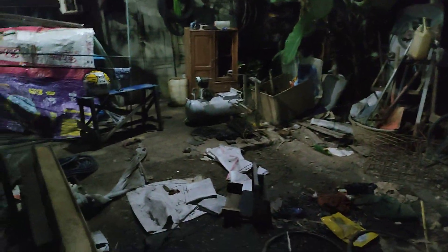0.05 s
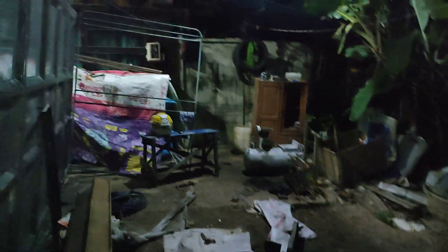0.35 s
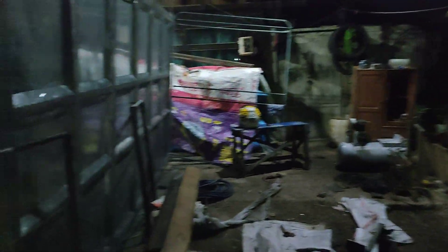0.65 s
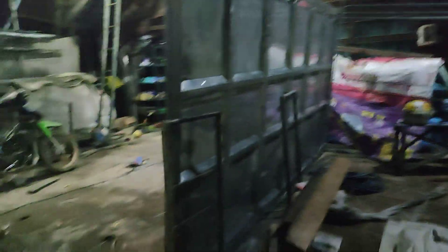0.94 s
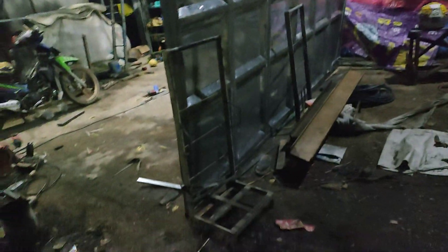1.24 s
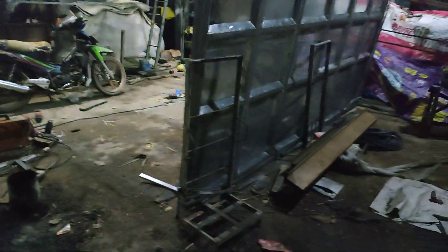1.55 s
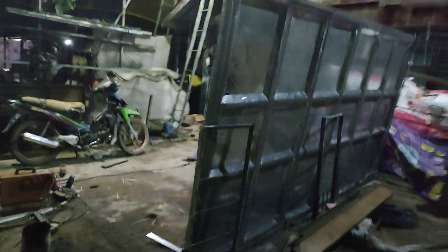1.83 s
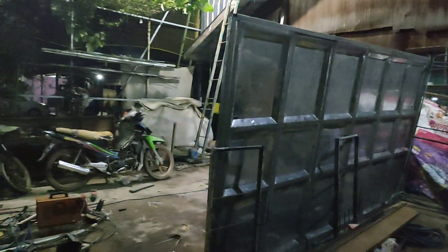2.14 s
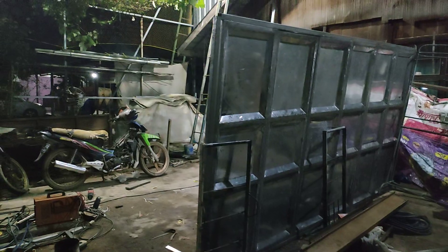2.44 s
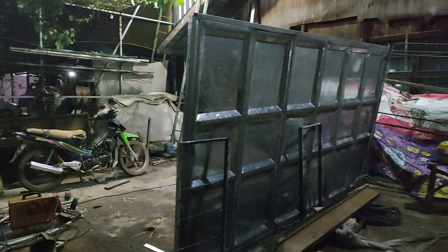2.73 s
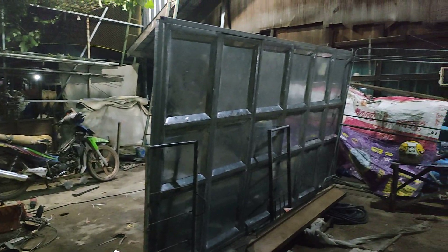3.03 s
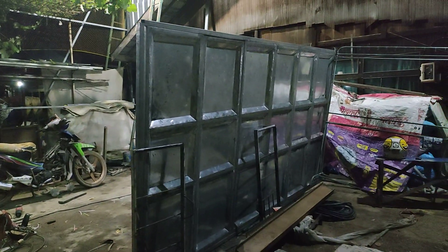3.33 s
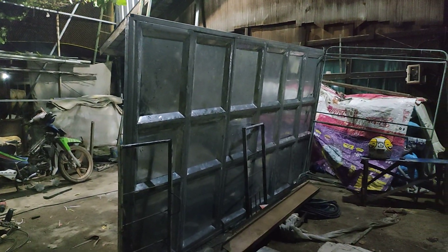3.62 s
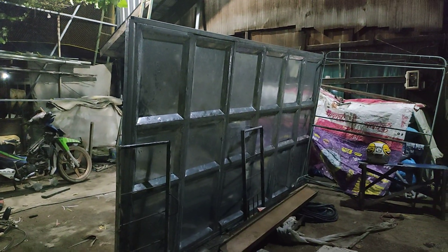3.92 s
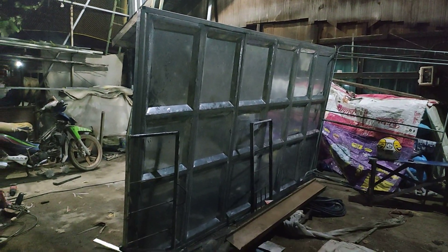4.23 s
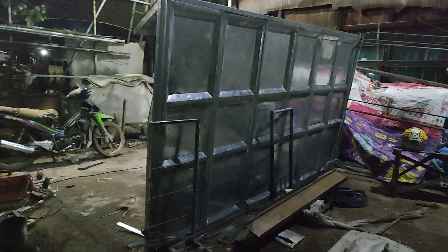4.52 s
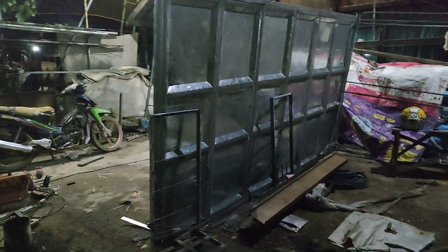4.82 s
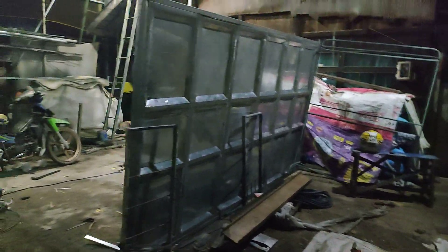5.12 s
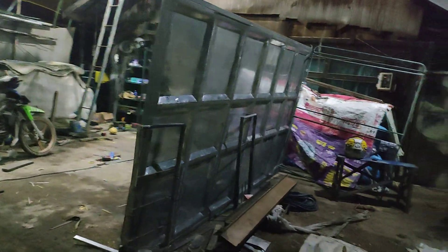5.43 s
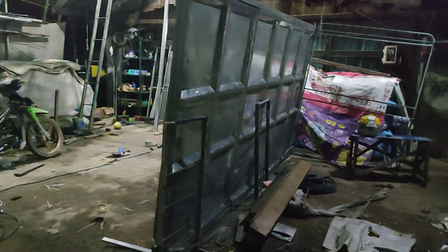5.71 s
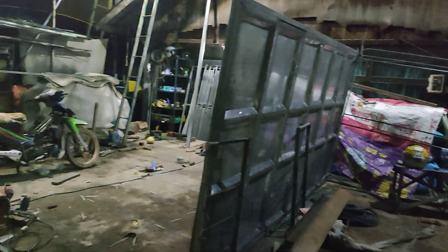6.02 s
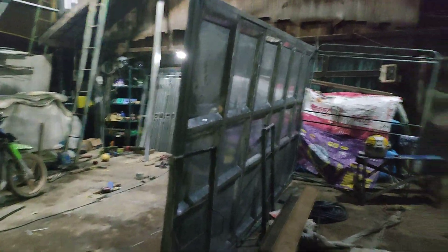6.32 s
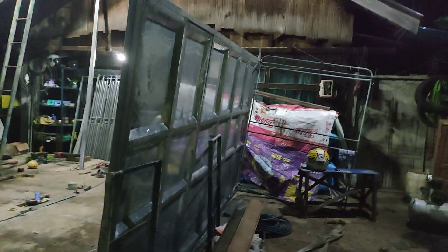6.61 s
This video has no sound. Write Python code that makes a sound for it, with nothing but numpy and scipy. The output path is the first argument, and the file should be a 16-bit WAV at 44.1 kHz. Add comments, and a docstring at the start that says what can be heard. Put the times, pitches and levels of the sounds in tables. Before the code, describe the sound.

Crickets shrill steadily at night while gritty footsteps and handling knocks sound close by, and a gecko chucks four times.

```python
"""Crickets shrill all around a cluttered yard at night, and two geckos chuck, one far off, one near.
The crickets rub their wings; the geckos send quick pulses through a ringing throat.
Someone takes a few steps, stands still, then walks on: grit scuffs and cracks, heels thud, clothes
rustle, and fingers knock and click on a hand-held camera. Walls and a steel gate answer faintly."""
import sys
import numpy as np
from scipy import signal
from scipy.fft import rfft, irfft, next_fast_len
from scipy.io import wavfile
from scipy.ndimage import uniform_filter1d, map_coordinates

SR = 44100
rng = np.random.default_rng(int(sys.argv[2]) if len(sys.argv) > 2 else 0)


def generate_wav(signal):
    """Clip the signal to [-1, 1] and save it as 16-bit WAV at the path in sys.argv[1]."""
    frames = np.transpose(np.atleast_2d(signal))
    scaled = np.clip(frames, -1, 1) * 32767
    pcm = np.round(scaled).astype(np.int16)
    wavfile.write(sys.argv[1], SR, pcm)


N = 293706
TIME = np.arange(N) / SR

# how alike the two ears hear the surroundings: (frequency [Hz], likeness [0 to 1])
AROUND_LIKENESS = [(40, 0.38), (250, 0.55), (650, 0.31), (1400, 0), (7000, 0.0025)]
# the same for sounds from the ground: (frequency [Hz], likeness [0 to 1])
GROUND_LIKENESS = [(100, 1), (640, 0.57), (1400, 0.23), (3100, 0.34), (7000, 0.08)]


def shrill_crickets(period_s=.1246, chirp_share=0.4, depth_db=5.5, rasp_db=2.5):
    """One cricket chirps eight times a second over a steady chorus; the walls smear its wing strokes."""
    # loudness of the chorus: (time [s], level [dB])
    loudness = [(0, -55), (2.4, -53.2), (3.4, -54.4), (6.66, -54)]
    # tone colour of the wings: (frequency [Hz], level [dB])
    wing_tone = [(4500, -41), (6000, -20.5), (6500, -3.5), (6880, 2), (7250, -4), (7600, -14.5),
                 (7950, -26.5), (8600, -48), (12500, -53), (13800, -31), (15000, -70)]
    beat = np.cos(2 * np.pi * (TIME - .025 + 0.0025 * wobble(5.7)) / period_s)
    chirp = unit(amp(depth_db * beat + wobble(6.8) + rasp_db * wobble(300)))
    soloist = np.sqrt(chirp_share) * noise(wing_tone, AROUND_LIKENESS, chirp)
    chorus = np.sqrt(1 - chirp_share) * noise(wing_tone, AROUND_LIKENESS)
    return amp(over_time(loudness)) * (soloist + chorus)


def geckos(pulse_hz=275, jitter=.07, pulse_t60=.013, sag=.025, echo_delay_s=.012):
    """Each chuck is a swell of quick pulses ringing a throat whose pitch sags a little."""
    # six far chucks, then four near:
    # (time [s], level [dB], pitch [Hz], breadth of the resonance [factor], half length [s], echo [dB])
    chucks = [(3.195, -54.5, 3960, 1.7, .016, -6.5), (3.375, -57, 3910, 1.9, .02, -3.5),
              (3.564, -54.5, 3880, 1.6, .016, -6), (3.765, -55.5, 3760, 2, .022, -5.5),
              (4, -58.5, 3810, 1.6, .021, -6), (4.162, -57.5, 4170, 1.6, .018, -8),
              (5.157, -36, 4110, 1.03, .013, -8.5), (5.324, -36, 4110, 1.07, .013, -8.5),
              (5.523, -33.5, 4120, 1.02, .012, -9.5), (5.735, -35.5, 4110, 1.04, .012, -8)]
    # the throat's resonance: (frequency [multiple of the pitch], level [dB])
    throat_tone = [(.2, -60), (.33, -37), (.41, -16), (.5, -20.5), (.69, -14.5), (.735, -18.5),
                   (.775, -8.5), (.83, -14), (.9, -3.5), (.96, 0), (1.035, 4), (1.08, -2.5), (1.115, -15),
                   (1.16, -7), (1.21, -19), (1.4, -19.5), (2, -66)]
    out, t = np.zeros((2, N)), np.arange(SR // 5) / SR
    middle = t.mean()
    for s, db, hz, breadth, width, echo_db in chucks:
        age = (t - middle) / width
        swell = np.clip(age + 2.45, 0, 1) / np.cosh(age)
        cycles = np.cumsum(pulse_hz * np.exp(jitter * wobble(150, size=len(t)))) / SR
        # every pulse is a sharp tick followed by a fading hiss
        ticks = unit(np.diff(np.floor(cycles), prepend=0))
        hiss = unit(fade(cycles % 1 / pulse_hz, pulse_t60) * rng.standard_normal((2, len(t))))
        voice = resonate(.8 * ticks + hiss, lambda f: along(throat_tone, (f / hz) ** (1 / breadth)))
        glide = np.cumsum(1 - sag * np.tanh(age))
        voice = np.array([map_coordinates(side, [glide]) for side in voice])
        call = amp(db) * swell * panned(unit(voice), pan_db=-2.0)
        add(out, s - middle, call)
        add(out, s - middle + echo_delay_s, amp(echo_db) * yard_echo(call))
    return out


def snaps_and_clicks(hump_db=6, hump_octaves=0.4, bright_hz=2840, echo_db=-13):
    """Grit cracks underfoot and the handled camera clicks: a sharp burst, a short ring, a low push."""
    # (time [s], level [dB], pitch [Hz], left over right [dB], low push [dB], ring [dB])
    snaps = [(.233, -26.5, 1090, 2, 5.5, -8), (.277, -38, 1500, 0, -10, -8),
             (.378, -36.5, 1920, -17, -16, -1), (.769, -38, 1490, -9, -13, -15.5),
             (0.9064, -18, 1980, 2, -0.5, -2), (.913, -22, 2070, 3, -12, -8),
             (0.9367, -22.5, 1600, -12, -14, 0), (.946, -22, 1080, 2, 1, -5),
             (.947, -16.5, 2835, -2, -3, 2), (.9482, -15.5, 2850, 0, -3, 2),
             (1.0628, -19.5, 3980, -4, -6, -3), (1.0716, -32, 1490, 8, -1, -6),
             (1.078, -22.5, 2820, 14, -20, -4.5), (1.089, -35, 1300, 5, -5, -6),
             (1.166, -30.5, 4570, -2, -.5, -5), (1.4226, -16.5, 1116, 1, 3.5, -7),
             (1.4275, -27, 1710, -2, -8, -8), (1.447, -33.5, 3350, 0, -15, 0),
             (1.452, -33, 1100, 0, -8, -2), (1.544, -24, 4180, -10, -25, 0.5),
             (2.0195, -28, 3200, 0, -25, -5), (2.0252, -22.5, 2940, -5, -26, 0),
             (2.0283, -21.5, 2940, 7, -30, -4.5), (2.0305, -28, 1290, 0, -20, 0),
             (2.171, -24.5, 3640, 15, -6, -18), (2.3486, -31, 2520, 14, -10, -8),
             (3.236, -42, 2900, 0, -15, -10), (5.412, -37, 1900, -2, -15, -6),
             (5.433, -29, 3800, -3, -13, -11), (5.4413, -26, 4730, -5, -32, -8),
             (6.029, -42, 6500, 2, -18, -10), (6.2112, -28.5, 2050, -3, -19, -0.5),
             (6.236, -22, 1740, -1, -9, -15), (6.255, -36, 3700, 0, -10, -3),
             (6.408, -41, 2370, 0, -15, -9), (6.418, -40, 2200, 1, -13, -9),
             (6.4575, -27, 1740, -7, -30, -3), (6.468, -26, 1650, -3, -17, -8),
             (6.4965, -31.5, 1520, 0, -22, -2), (6.524, -22.5, 3620, -1, -12, -3),
             (6.529, -28, 2250, -2, -16, -1.5), (6.552, -32.5, 3200, -9, 5, -7)]
    # tone colour of a snap: (frequency [Hz], level [dB])
    snap_tone = [(60, -55), (200, 2.5), (500, -6.5), (1200, 8), (3000, -0.5), (4500, -3.5), (7000, -20),
                 (10000, -35), (15000, -46)]
    out, t = np.zeros((2, N)), np.arange(SR // 20) / SR
    onset = 1 - np.exp(-t / .0004)
    for s, db, hz, pan_db, push_db, ring_db in snaps:
        burst = fade(t, t60=.006) * (0.76 * rng.standard_normal(len(t)) + rng.standard_normal((2, len(t))))
        burst[:, SR // 2000] -= 5  # the click
        # a snap is lifted around its own pitch, and high ones tick brighter
        hump = lambda f: hump_db * np.exp(-(np.log2((f + 1) / hz) / hump_octaves) ** 2)
        tilt = 11.5 * max(np.log2(hz / bright_hz), 0)  # dB per octave
        snap = resonate(burst, lambda f: along(snap_tone, f) + tilt * np.log2(f / hz + 0.041) + hump(f))
        snap *= 3 / np.linalg.norm(snap, axis=1, keepdims=True)
        ring = amp(ring_db) * np.sin(2 * np.pi * hz * t + [[0], [1.2]]) * fade(t, t60=0.014)
        push = amp(push_db - 3) * np.cos(2 * np.pi * 600 * t) * fade(t, t60=0.0059)
        add(out, s + 0.001735, amp(db) * panned(snap + (ring + push) * onset, pan_db))
        add(out, s + .006, amp(db + echo_db) * yard_echo(snap))
    return out


def dull_knocks(firm_hz=593, firm_t60=0.0088, lag_s=0.0004, attack_s=0.0009, echo_db=-27):
    """Fingers knock on the camera's case and a few heels thud on the ground: a thump and a brief ring."""
    # (time [s], level [dB], pitch [Hz], left over right [dB], ring [dB])
    knocks = [(.101, -45, 337, 10, 0), (0.3431, -23, 420, -11, 3.5), (.405, -35.5, 460, 28, 0),
              (.45, -41, 455, 5, 9), (1.078, -22, 638, 16, -4), (1.097, -30.5, 624, 6, -7),
              (1.1261, -21, 630, 18, -9), (1.141, -29.5, 590, 16, -6), (1.5875, -33, 800, 18, -5),
              (1.6133, -19, 610, 17, -8), (1.623, -27, 614, 13, -9.5), (1.63, -30, 720, 6, -2),
              (2.1689, -28.5, 620, 11.5, -7), (2.205, -29.5, 626, 14, -12), (2.2695, -36, 520, 17, 1),
              (2.319, -43, 600, 11, 0), (2.329, -39, 480, 11, 11), (2.3476, -22, 625, 15, -10),
              (2.365, -30, 546, 7, -6), (2.376, -38, 557, 11.5, -13), (5.025, -42.5, 425, 16, -2),
              (5.866, -47, 326, 0.5, 6), (6.236, -38.5, 510, 0.5, -3), (6.281, -43, 620, 11, -9),
              (6.298, -39.5, 620, 17, -12), (6.334, -44, 340, 0.5, 3), (6.523, -25, 644, 0.5, -11)]
    # the notes the case rings at: (frequency [Hz], level [dB], time to fade by 60 dB [s])
    case_notes = [(415, -14.5, 0.032), (1075, -4, 0.012), (1430, -1, 0.0065), (2440, -8, 0.013),
                  (3770, -6, 0.0057)]
    out, t = np.zeros((2, N)), np.arange(SR // 12) / SR
    for s, db, hz, pan_db, ring_db in knocks:
        t60 = firm_t60 * (firm_hz / hz) ** 2.6  # a softer, lower thump rings longer
        age = np.maximum(t - lag_s * np.array([[pan_db < 0], [pan_db > 0]]), 0)  # nearer side first
        thump = -np.sin(2 * np.pi * hz * age) * fade(age, t60)
        ring = 0
        for note_hz, note_db, note_t60 in case_notes:
            strength = amp(note_db + rng.normal(0, 4.2))
            detuned_hz = note_hz * (1 + rng.normal() * 0.035)
            ring += strength * np.sin(2 * np.pi * detuned_hz * age) * fade(age, note_t60)
        knock = (thump - amp(ring_db) * ring) * (1 - np.exp(-age / attack_s))
        # a knock has little bass, and a soft, low one leaves the treble out
        top_hz = np.clip(6 * hz * (hz / 600) ** 2, 1400, 5000)
        knock = signal.sosfilt(signal.butter(2, [240, top_hz], "bandpass", fs=SR, output="sos"), knock)
        knock = amp(db + 1.5) * panned(knock / np.abs(knock).max(), pan_db)
        add(out, s + 0.001763, knock)
        add(out, s + 0.005, amp(echo_db) * yard_echo(knock))
    return out


def sole_strokes(drag_delay_s=.115, drag_rise_s=0.09, drag_fall_s=0.11, drag_heel_db=-14):
    """In every step the sole presses down, then rolls off and drags."""
    # (time [s], level [dB], rise by 20 dB [s], fall by 20 dB [s], heel [dB], drag [dB])
    steps = [(.222, -42, 0.02, .099, -14, -16.5), (.957, -38, .06, 0.08, -9.5, -13),
             (1.418, -38, .036, .115, -13, -9.5), (2.028, -36.5, 0.04, .03, -37, -20.5),
             (2.219, -56, .05, 0.39, -16, -3), (2.519, -54.5, 0.14, 0.16, -29, -27),
             (3.255, -57.5, 0.04, 0.12, 1, -9), (4.135, -62, 0.05, 0.13, 2.5, -18),
             (5.437, -40, .048, .03, -10.5, -16), (5.869, -53.5, 0.01, .076, 4.5, -4.5),
             (6.212, -46, 0.02, .06, -29, -19), (6.262, -44, 0.03, 0.085, -10, -17),
             (6.467, -45.5, 0.04, .14, -36, -14), (6.536, -48, 0.01, .1, -4.5, -29)]
    presses = [step[:5] for step in steps]
    drags = [(s + drag_delay_s, db + drag_db, drag_rise_s, drag_fall_s, drag_heel_db)
             for s, db, *_, drag_db in steps]
    return presses + drags


def scuffs(grain_db=4, clump_db=1.1):
    """Grit gives way under a sole in uneven clumps, over the heel's dull tread."""
    # tone colours of the grit and of the heel: (frequency [Hz], level [dB])
    grit_tone = [(88, -38), (150, -12), (787, -16), (1320, -5), (2360, -5.5), (2860, -4.5), (4000, -4.5),
                 (4700, -7), (6300, -10.5), (6940, -11), (8100, -37), (9090, -29), (10000, -25),
                 (15000, -29.5)]
    heel_tone = [(70, -34), (150, -6.5), (260, 4.5), (400, 2), (600, 3), (1000, -0.5), (2000, -13.5),
                 (4000, -52)]
    grit, heel = np.zeros(N), np.zeros(N)
    for s, db, rise, fall, heel_db in sole_strokes():
        span = slice(*np.searchsorted(TIME, [s - 2 * rise, s + 2 * fall + .2]))
        age = TIME[span] - s
        power = amp(db - 20 * np.maximum(-age / rise, age / fall)) ** 2
        grit[span] += power
        heel[span] += power * amp(heel_db) ** 2
    crunch = noise(grit_tone, GROUND_LIKENESS, amp(grain_db * wobble(1500) + clump_db * wobble(140)))
    return np.sqrt(grit) * crunch + np.sqrt(heel) * noise(heel_tone, GROUND_LIKENESS)


def grain_ticks(count, gain_db, spread_db, hz, t60):
    """Under each sole single grains tick, each at its own pitch."""
    out, t = np.zeros((2, N)), np.arange(SR // 50) / SR
    shape = fade(t, t60) * (1 - np.exp(-t / 0.00012))
    for s, db, rise, fall, _ in sole_strokes():
        for when, size, pitch, left, right in np.clip(rng.standard_normal((count, 5)), -2, 2):
            tick = np.sin(2 * np.pi * hz * np.exp(.4 * pitch) * t + [[left], [right]]) * shape
            start = s + .5 * when * (fall if when > 0 else rise)
            add(out, start, amp(db + gain_db + spread_db * size - 7.3 * abs(when)) * tick)
    return out


def weight_thuds():
    """The walker's weight lands on the ground with a dull thud."""
    # (time [s], level [dB], pitch [Hz], half length [s])
    landings = [(5.882, -55.5, 265, 0.021), (6.342, -54, 230, 0.012)]
    return soft_tones(landings, waver=.15)


def sand_slides(grain_db=9.0, clump_db=2):
    """Sand under a sliding sole crunches in fine, bright clumps."""
    # (time [s], level [dB], half length [s])
    slides = [(.25, -66, .025), (.8, -74, .1), (.92, -64, .04), (1.43, -70, 0.03), (1.495, -64, 0.024),
              (2.2, -73, 0.17), (2.54, -74, 0.066), (3.41, -64.5, 0.006), (5.38, -70, 0.054),
              (5.55, -69, 0.05), (6.23, -67, 0.037), (6.53, -69.5, 0.093)]
    # tone colour of the sand: (frequency [Hz], level [dB])
    sand_tone = [(3500, -37), (6000, -1), (9000, -3), (12000, 6), (15000, -5)]
    clumps = amp(grain_db * wobble(1200) + clump_db * wobble(130))
    return np.sqrt(swells(slides)) * noise(sand_tone, GROUND_LIKENESS, clumps)


def slow_cricket(half_length_s=0.041, echo_delay_s=0.073, echo_db=-11.5, echo_stretch=3.2):
    """A slower, lower cricket's soft, raspy chirps linger between the walls."""
    # about three and a half chirps a second: (time [s], level [dB])
    chirps = [(.095, -60.5), (.42, -60), (.65, -64), (.94, -65), (1.2, -54), (1.48, -57.5), (1.75, -53),
              (2, -57), (2.26, -54.5), (2.55, -54), (2.84, -56), (3.12, -58), (3.42, -55.5), (3.74, -62),
              (4.22, -59.5), (4.49, -61), (4.79, -54.5), (5.05, -55), (5.32, -52.5), (5.6, -51.5),
              (5.88, -52.5), (6.19, -53), (6.5, -54.5)]
    # tone colour of a chirp: (frequency [Hz], level [dB])
    chirp_tone = [(4300, -36), (5000, -3.5), (5450, 2), (5850, -4.5), (6500, -5), (7500, -36.5)]
    direct = [(s, db, half_length_s) for s, db in chirps]
    late = [(s + echo_delay_s, db + echo_db, half_length_s * echo_stretch) for s, db in chirps]
    return np.sqrt(swells(direct + late)) * noise(chirp_tone, AROUND_LIKENESS, amp(1.3 * wobble(250)))


def bush_crickets():
    """Crickets in the bushes blend into an even, high sizzle."""
    # (frequency [Hz], level [dB])
    sizzle_tone = [(7800, -63), (8300, -4), (8650, 2.5), (9400, 0), (9850, -10), (10300, -65), (12000, -54)]
    return amp(-65.5 + 1.64 * wobble(7)) * noise(sizzle_tone, AROUND_LIKENESS, amp(1.16 * wobble(250)))


def far_peeps():
    """Three faint peeps sound far away."""
    # (time [s], level [dB], pitch [Hz], half length [s])
    peeps = [(.61, -60, 2770, .025), (3.45, -66, 2450, .025), (4.69, -71, 895, .028)]
    return soft_tones(peeps, waver=.05)


def air_and_clothes(air_db=-71.5, clothes_db=-67):
    """As the walker moves, air rumbles over the microphone and clothes rustle."""
    # how much the walker moves: (time [s], motion [dB])
    motion = [(0, 7), (2.3, -1.5), (3.1, -13.5), (4.8, -6), (5.4, 6), (6.66, -34)]
    # swings of the camera and swishes of cloth: (time [s], level [dB], half length [s])
    swings = [(.02, -45, 0.02), (1.03, -58, 0.07), (1.5, -62, 0.068), (2.96, -66.5, 0.11), (5.58, -55, 0.1),
              (6.15, -65, 0.09)]
    swishes = [(0, -51.5, 0.033), (.42, -55, 0.066), (1, -62, 0.14), (2.6, -66.5, 0.12),
               (3.9, -68.5, 0.078), (5.52, -56, 0.062), (5.91, -56, 0.047), (6.08, -59, 0.097),
               (6.25, -61, 0.55)]
    # tone colours of the air and of the cloth: (frequency [Hz], level [dB])
    air_tone = [(15, 9.5), (33, 13), (50, 9), (75, -14), (200, -75)]
    cloth_tone = [(100, -50), (200, -10), (380, 1), (600, -4), (900, -11), (3000, -10), (8000, -24),
                  (12000, -36.5)]
    motion_db = over_time(motion)
    flow = np.sqrt(amp(air_db + 0.39 * motion_db) ** 2 + swells(swings)) * amp(2.8 * wobble(7.2))
    air = np.sqrt(np.mean(flow ** 2)) * panned(noise(air_tone, AROUND_LIKENESS, flow), pan_db=1.0)
    rubbing = np.sqrt(amp(clothes_db + motion_db) ** 2 + swells(swishes)) * amp(2.74 * wobble(25))
    return air + rubbing * patchy(noise(cloth_tone, AROUND_LIKENESS))


def night_hush(level_db=-59.5):
    """The far hush of the night shimmers softly behind everything."""
    # (frequency [Hz], level [dB])
    hush_tone = [(25, 5), (110, -0.5), (195, 3.5), (300, -5), (600, -12.5), (1300, -15.5), (2100, -11),
                 (3000, -5), (3600, -4.5), (4150, -2), (4700, -10.5), (5500, 1.5), (6300, -6), (8000, -14),
                 (11000, -39), (15000, -42)]
    return amp(level_db) * patchy(noise(hush_tone, AROUND_LIKENESS))


def yard_echo(x):
    """The yard throws x back as a smeared echo, about as strong as x."""
    # (frequency [Hz], time to fade by 60 dB [s])
    fade_times = [(200, 0.048), (1500, 0.4), (4200, 0.5), (10000, 0.0097)]
    hz, t, bands = signal.stft(rng.standard_normal((2, SR // 2)), SR, nperseg=256)
    tail = signal.istft(bands * fade(t, along(fade_times, hz)[:, None]), SR, nperseg=256)[1]
    return signal.fftconvolve(np.atleast_2d(x), tail / np.linalg.norm(tail[0]), axes=1)


def amp(db):
    """Turn decibels into a gain."""
    return 10 ** (np.asarray(db) / 20)


def unit(x):
    """Scale x to an average strength (rms) of 1."""
    return x / np.sqrt(np.mean(x ** 2) + 1e-20)


def along(points, hz):
    """Read between (frequency, value) points, with octaves evenly spaced."""
    f, values = np.transpose(points)
    return np.interp(np.log(hz + 1e-6), np.log(f), values)


def over_time(points):
    """Join (time, value) points into one value per sample."""
    return np.interp(TIME, *np.transpose(points))


def wobble(rate, size=N):
    """A smooth curve through rate random points a second."""
    return map_coordinates(rng.standard_normal(int(size * rate / SR) + 4), [TIME[:size] * rate])


def fade(t, t60):
    """Die away by 60 dB every t60 seconds."""
    return np.exp(-np.log(1000) * t / np.maximum(t60, 1e-4))


def swells(rows):
    """The summed power of bell-shaped swells."""
    power = np.zeros(N)
    for s, db, width in rows:
        span = slice(*np.searchsorted(TIME, [s - 4 * width, s + 4 * width]))
        power[span] += amp(db) ** 2 * np.exp(-((TIME[span] - s) / width) ** 2)
    return power


def soft_tones(rows, waver):
    """Brief tones that swell and waver in pitch."""
    out = np.zeros(N)
    for s, db, hz, width in rows:
        cycles = hz * np.cumsum(1 + waver * wobble(200)) / SR
        out += np.sqrt(2 * swells([(s, db, width)])) * np.sin(2 * np.pi * cycles)
    return out


def filtered(x, response):
    """Scale each frequency in x by response(frequency)."""
    n = x.shape[-1]
    padded = next_fast_len(n + 8192)
    return irfft(rfft(x, padded) * response(np.fft.rfftfreq(padded, 1 / SR)), padded)[..., :n]


def resonate(x, gain_db, size=2048):
    """Let x ring a body whose tone colour is gain_db(frequency)."""
    cepstrum = irfft(np.log(amp(gain_db(np.fft.rfftfreq(size, 1 / SR)))))
    # fold it so that the ringing never comes before its cause
    cepstrum[1:size // 2] *= 2
    cepstrum[size // 2 + 1:] = 0
    ringing = irfft(np.exp(rfft(cepstrum)))
    return signal.fftconvolve(x, ringing[None], axes=1)[:, :x.shape[1]]


def noise(tone, likeness, swell=1):
    """Stereo noise of strength 1, shaped by swell and then coloured by tone."""
    def response(hz):
        spread = np.arccos(np.clip(along(likeness, hz), -1, 1)) / 2
        return amp(along(tone, hz)) * [np.cos(spread), np.sin(spread)]
    mid, side = filtered(swell * rng.standard_normal((2, N)), response)
    return unit(np.array([mid + side, mid - side]))


def patchy(x, depth_db=2):
    """Let each frequency band of x swell and sink on its own."""
    bands = signal.stft(x, nperseg=512)[2]
    drift = uniform_filter1d(rng.standard_normal(bands.shape[1:]), 5, axis=0)
    drift = uniform_filter1d(drift, 22, axis=1)
    return unit(signal.istft(bands * amp(depth_db * unit(drift)), nperseg=512)[1][:, :N])


def panned(x, pan_db):
    """Make the left side pan_db louder than the right."""
    return unit(amp([[pan_db / 2], [-pan_db / 2]])) * x


def add(track, s, sound):
    """Mix a stereo sound in at s seconds."""
    start = max(round(s * SR), 0)
    track[:, start:start + sound.shape[1]] += sound[:, :max(N - start, 0)]


def scene():
    """Insects and geckos around the yard, feet and fingers close by."""
    animals = shrill_crickets() + bush_crickets() + slow_cricket() + geckos() + far_peeps()
    pebbles = grain_ticks(count=10, gain_db=4.5, spread_db=-1.5, hz=2410, t60=0.012)
    sand = grain_ticks(count=14, gain_db=7.5, spread_db=2.0, hz=4550, t60=0.0021)
    feet = weight_thuds() + scuffs() + pebbles + sand + sand_slides()
    return animals + feet + snaps_and_clicks() + dull_knocks() + air_and_clothes() + night_hush()


def record(dry):
    """The camera keeps nothing above 15400 Hz."""
    return filtered(dry, lambda hz: hz < 15400)


dry = scene()
out = record(dry)
generate_wav(out)
```